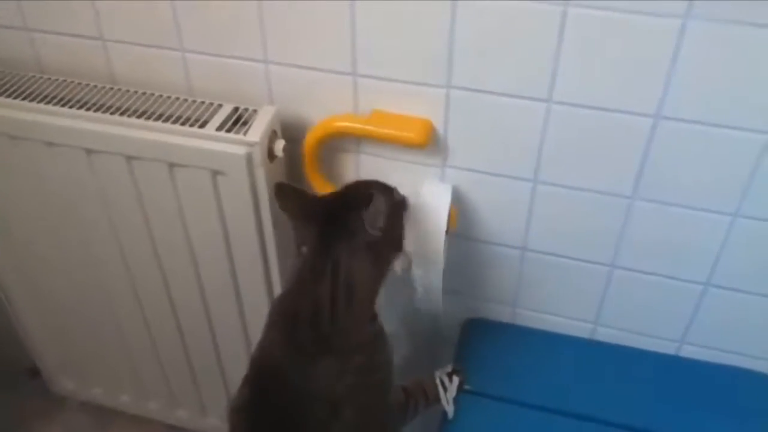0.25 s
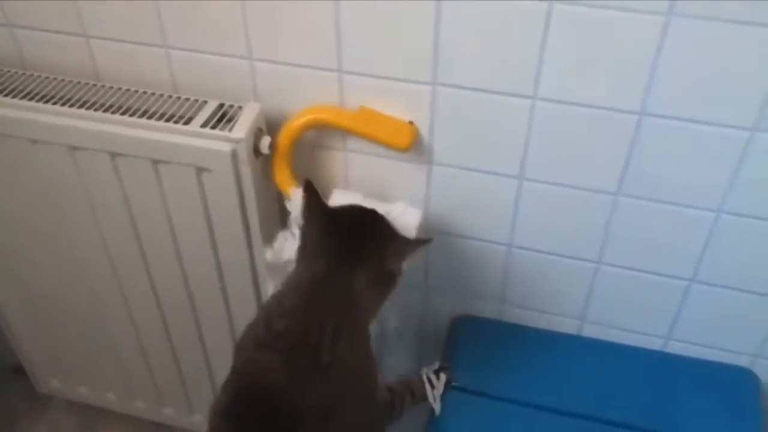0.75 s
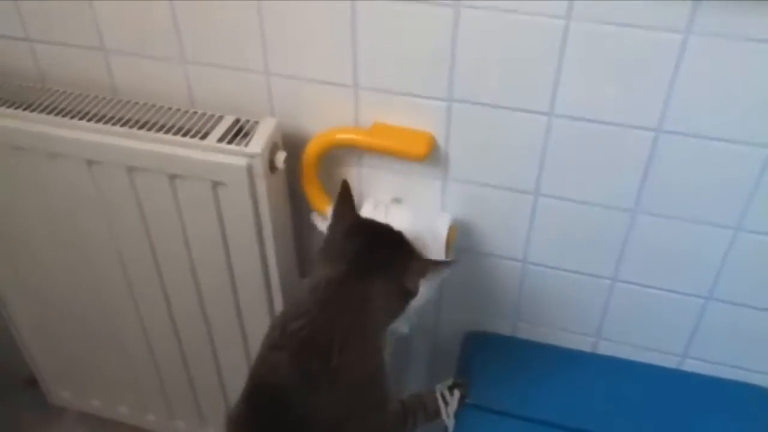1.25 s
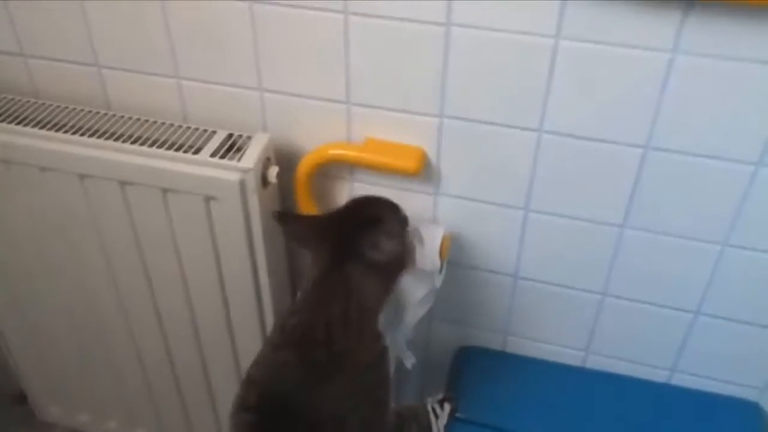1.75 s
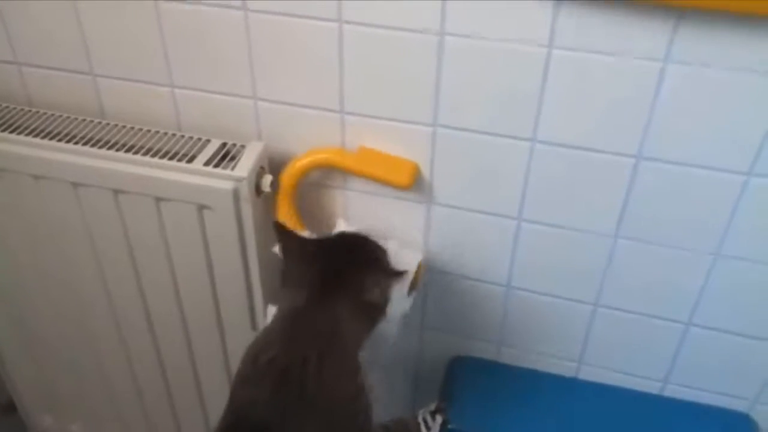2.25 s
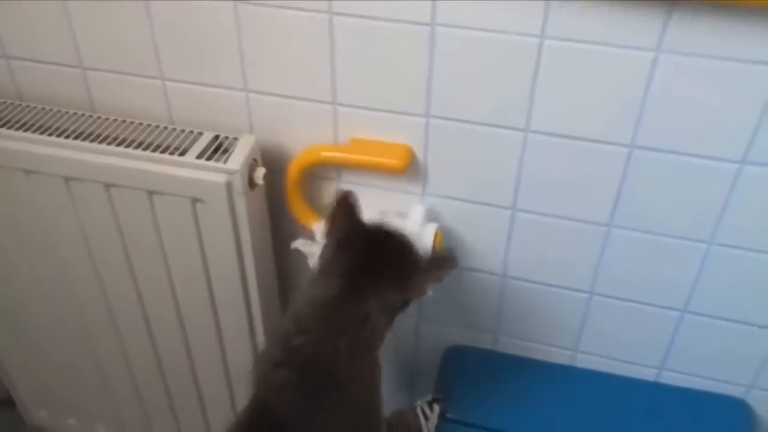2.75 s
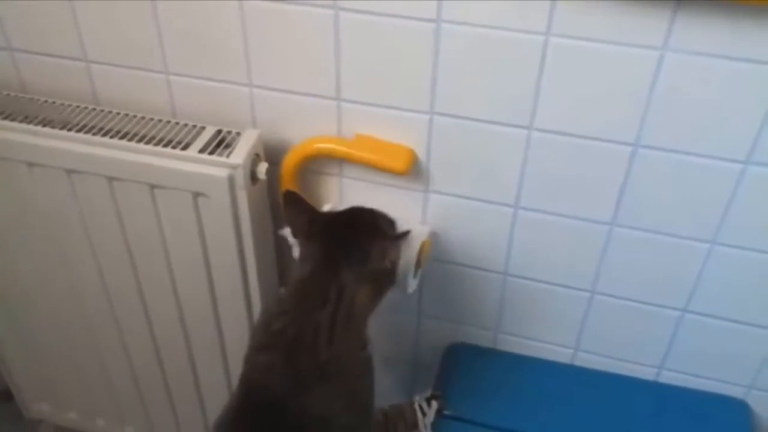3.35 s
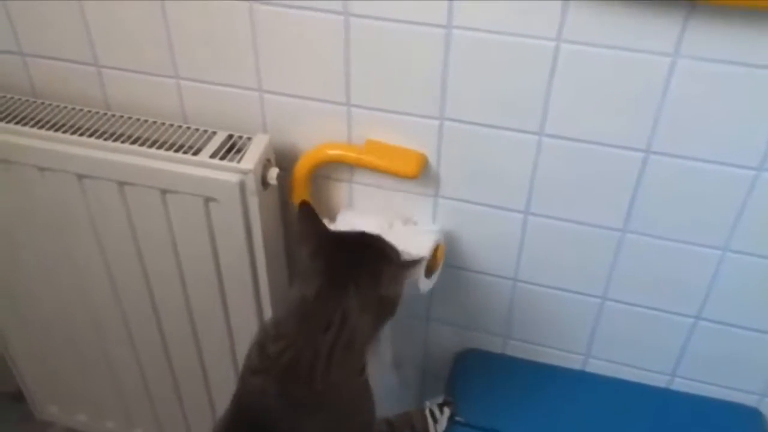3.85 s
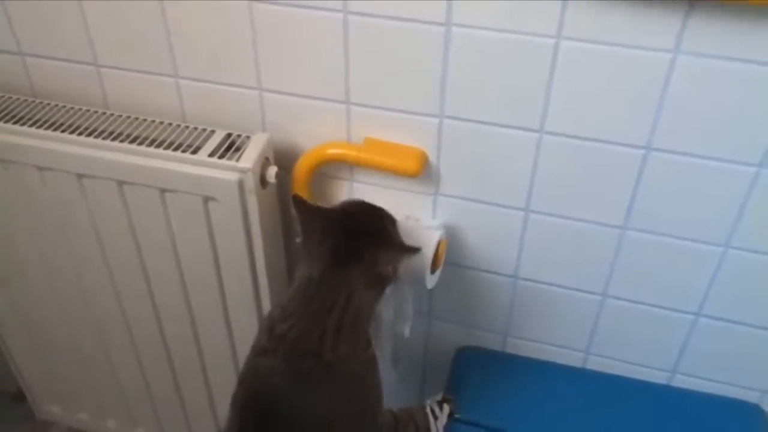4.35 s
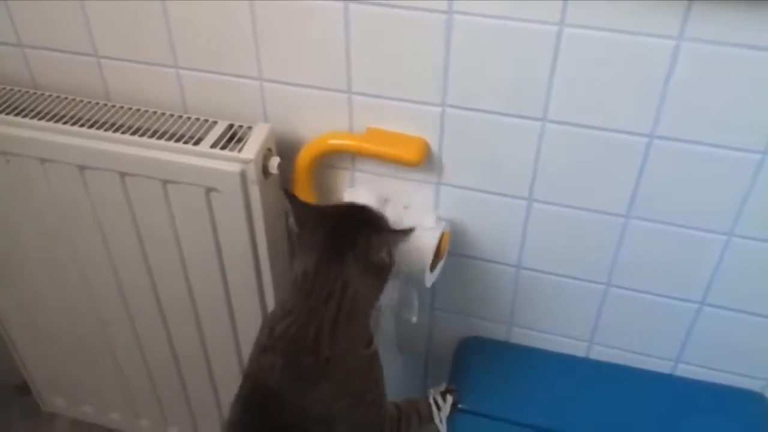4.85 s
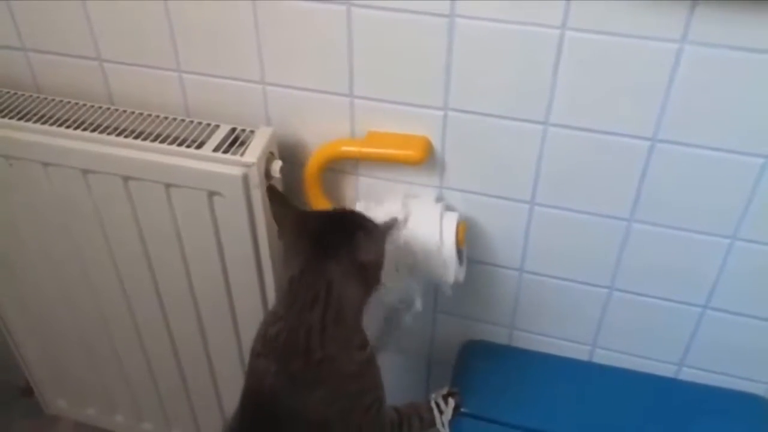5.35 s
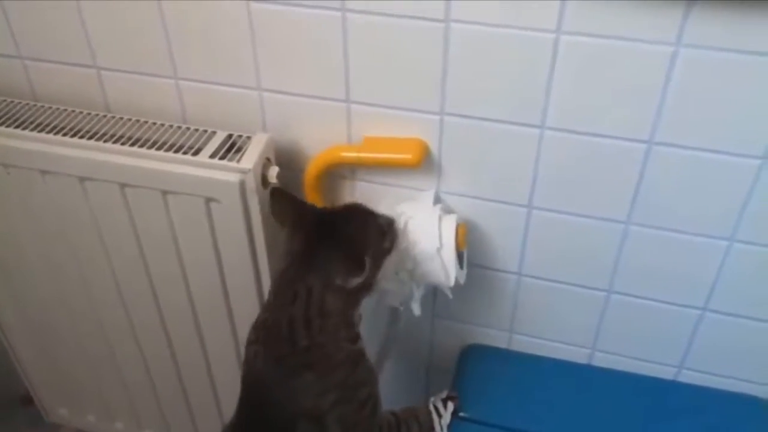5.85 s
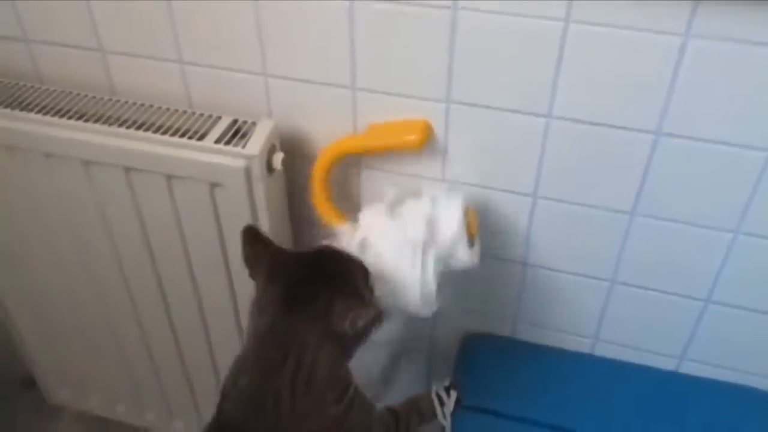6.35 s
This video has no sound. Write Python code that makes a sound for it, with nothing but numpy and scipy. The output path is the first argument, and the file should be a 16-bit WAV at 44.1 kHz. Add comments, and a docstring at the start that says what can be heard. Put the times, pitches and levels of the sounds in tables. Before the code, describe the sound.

Irregular clunks of a paper roll against its wall holder, mixed with scrabbly rustling and short tears, close by in a small hard room.

```python
"""Paper rustles and tears as a cat claws at a toilet paper roll on a plastic wall holder in a tiled bathroom.
Paper is clumped fibre snaps, shaped in half-octave bands; resonators ring as the cardboard core.
Blows and rocking of the roll ring the modes of holder arm and wall; claws knock as short damped sines.
Tiles add a short dense tail of decaying noise; faint hiss and two thin whistles lie below."""
import sys
import numpy as np
from scipy import signal
from scipy.fft import rfft, irfft
from scipy.io import wavfile

SR = 44100
rng = np.random.default_rng(int(sys.argv[2]) if len(sys.argv) > 2 else 0)


def amplitude_ratio(level_db):
    """Convert a level in decibels to the matching linear amplitude (field) ratio."""
    exponent = np.asarray(level_db, float) / 20
    return 10 ** exponent


def persist_wave(psi):
    """Save psi, clipped to +-1, as 16-bit WAV."""
    counts = np.round(np.clip(psi, -1, 1) * 32767).astype(np.int16)
    wavfile.write(sys.argv[1], SR, np.atleast_2d(counts).T)


N = 291060

# The roll thrown against the arm. Each row: start in seconds, level in dB, hardness in dB per octave.
ROLL_BLOWS = [(0.003, -26.5, -2), (0.138, -23.5, 6.5), (0.185, -24, -1), (0.205, -18.5, -1),
              (0.264, -27, -0.5), (0.284, -20.5, 6.5), (0.344, -31.5, 1), (0.655, -49, 8),
              (1.113, -43, 7.5), (1.155, -46, 0), (1.599, -30.5, -1), (1.618, -21, 4.5), (1.639, -15, -6),
              (1.66, -32, -9), (1.726, -52, -9), (2.809, -17.5, 9), (2.849, -17.5, -5), (2.915, -18, 1.5),
              (3.019, -24, 1), (3.038, -23, -2.5), (3.96, -52, 4), (4.071, -32, 13), (4.223, -25, 1),
              (4.254, -22.5, -1), (4.274, -28, 2.5), (5.31, -47, 4), (5.459, -25, -7), (5.5, -27, -9),
              (5.716, -29, -9), (5.738, -27, -0.5), (6.09, -45, 8.5), (6.38, -45.5, -10.5),
              (6.554, -37, -10), (6.582, -33, -2)]


def rms_one(x):
    """Scales to rms 1."""
    return x / np.sqrt(np.mean(x ** 2) + 1e-20)


def at_hz(points, hz):
    """Reads a curve on a log-frequency axis."""
    points_hz, values = np.transpose(points)
    return np.interp(np.log(hz + 1), np.log(points_hz), values)


def colour(x, spectrum):
    """Shapes noise by a spectrum in dB; rms 1."""
    bins_hz = np.arange(N // 2 + 1) * SR / N
    return rms_one(irfft(rfft(x) * amplitude_ratio(at_hz(spectrum, bins_hz)), N))


def cut(x, hz, kind):
    """Second-order high- or low-pass."""
    sos = signal.butter(2, np.clip(hz, 20, .45 * SR), kind, fs=SR, output="sos")
    return signal.sosfilt(sos, x)


def drift(rate_hz):
    """Slow random wander of rms 1: noise through two equal one-pole low-passes."""
    r = np.exp(-2 * np.pi * rate_hz / SR)
    wander = signal.lfilter([1], [1, -2 * r, r * r], rng.standard_normal(N + SR))
    return rms_one(wander[SR:])     # the filter settles in the first second


def ring(drive, hz, t60_s):
    """Two-pole resonator: a unit click sets off a decaying sine of initial height 1."""
    r = amplitude_ratio(-60 / (max(t60_s, .002) * SR))
    w = 2 * np.pi * hz / SR
    return signal.lfilter([0, np.sin(w)], [1, -2 * r * np.cos(w), r * r], drive + 1e-18)


def add(out, start_s, sound):
    """Mixes a short sound in at its start time."""
    i = round(start_s * SR)
    out[i:i + len(sound)] += sound[:N - i]


def pawing(hollow):
    """Level of all paw strokes, each swelling and fading evenly in dB; hollow weighs the ring of the core."""
    # Each row: peak time in seconds, level in dB, swell and fade in seconds per 12 dB, hollow core ring in dB.
    strokes = [(0.0, -40.5, .02, 0.071, -3), (.068, -47, .02, 0.031, -5), (.1, -47.5, 0.045, .3, -1),
               (.5, -54.5, .01, 0.089, 0), (.56, -54.5, 0.056, 0.044, 8), (.652, -55.5, 0.014, 0.28, -7),
               (.75, -50.5, 0.095, 0.12, 6), (0.819, -47, .03, 0.035, 9), (.857, -47, 0.027, .05, 7.5),
               (.91, -49.5, 0.12, 0.089, 2), (1.047, -50, 0.035, 0.06, -6.5),
               (1.116, -52.5, 0.11, 0.16, 1.5), (1.27, -51, 0.12, 0.073, -3), (1.33, -54, 0.06, 0.14, -7),
               (1.402, -49, 0.049, 0.12, -2.5), (1.78, -55.5, 0.44, 0.073, 2),
               (1.888, -60, 0.056, 0.19, -1), (2.06, -48.5, 0.022, .03, 0), (2.198, -50.5, .06, 0.048, 1),
               (2.424, -49.5, .13, 0.12, 2), (2.49, -48, 0.09, 0.074, 2.5),
               (2.585, -46.5, 0.082, 0.066, 1.5), (2.67, -51.5, 0.058, 0.082, 2.5),
               (2.775, -53, 0.035, .12, -5), (3.305, -55, 0.014, .12, 3), (3.39, -52, 0.11, 0.14, 2.5),
               (3.502, -59.5, 0.026, 0.014, 5), (3.556, -53.5, .008, .15, 5), (3.63, -54, 0.1, .15, 0.5),
               (3.73, -51, .08, 0.12, -1), (3.786, -46, .1, 0.071, 3), (3.924, -45.5, 0.029, 0.058, 2.5),
               (4.045, -45.5, 0.041, 0.047, -3), (4.12, -50, .08, 0.02, 1), (4.18, -51, 0.087, .06, 3),
               (4.211, -43.5, 0.0051, 0.12, -1), (4.3, -45, 0.13, 0.15, -6), (4.37, -51.5, .04, 0.034, -1),
               (4.606, -58.5, 0.045, .09, 4), (4.703, -50.5, .01, 0.0089, -4), (4.78, -58.5, .05, 0.025, 1),
               (4.84, -59, 0.048, 0.15, 1), (4.982, -57, 0.058, 0.094, 11.5), (5.03, -56, .02, .15, -4),
               (5.18, -56, 0.073, .2, 10), (5.274, -50.5, .15, .08, 3.5), (5.364, -44.5, 0.14, 0.022, 5.5),
               (5.45, -45, 0.09, 0.078, -4), (5.568, -71.5, .005, 0.063, 24), (5.71, -50, 0.078, 0.24, -19),
               (5.896, -54, 0.48, 0.027, 2), (6.012, -53.5, 0.092, 0.034, 0), (6.14, -53, 0.12, 0.075, -4),
               (6.25, -60, 0.069, 0.085, 6), (6.362, -51, 0.17, 0.09, -4),
               (6.43, -46.5, 0.043, 0.062, -1.5), (6.49, -58, 0.058, .05, -1),
               (6.546, -43.5, 0.063, 0.22, -0.5)]
    range_db, grid_s = 12, .002
    t = np.arange(0, N / SR + grid_s, grid_s)
    peak_s, db, swell_s, fade_s, core_db = np.transpose(strokes)[:, :, None]
    before = (peak_s - t) / np.maximum(swell_s, .003)
    after = (t - peak_s) / np.maximum(fade_s, .003)
    down = np.where(t < peak_s, before, after)
    power = amplitude_ratio(db + hollow * core_db - range_db * down) ** 2
    return np.interp(np.arange(N) / SR, t, np.sqrt(power.sum(axis=0)))


def fibres(per_s, spread_db, clump_db):
    """Fibres snap in clumps, with uneven sizes; the sheet colours them."""
    # Each row: frequency in Hz, relative level in dB per Hz.
    sheet_spectrum = [(250, -16), (450, -7), (700, -2), (1000, 0.5), (1400, -0.5), (2000, -2), (3000, -7),
                      (4500, -12.5), (7000, -18), (10000, -27), (13000, -36), (15500, -50)]
    snaps = rng.random(N) < per_s * amplitude_ratio(clump_db * drift(25)) / SR
    sizes = amplitude_ratio(spread_db * np.minimum(rng.exponential(1, N), 5))
    signs = rng.choice([-1, 1], N)
    return colour(snaps * sizes * signs, sheet_spectrum)


def paper():
    """Rustle follows the paws, tears swell and die; brightness tilts both about 1500 Hz; the tube rings along."""
    # Paper jerked and torn. Each row: start in seconds, level in dB, rise in seconds, length in seconds,
    # brightness in dB per octave.
    tears = [(0.104, -30, .006, 0.022, 4.5), (0.118, -18, 0.0049, 0.1, -3.5),
             (0.178, -16.5, 0.0016, 0.018, 2), (0.253, -17.5, 0.0044, 0.04, -8.5),
             (0.796, -30, 0.013, 0.017, 2), (1.358, -34, 0.0076, 0.045, 5.5),
             (1.59, -18, 0.011, 0.055, 3.5), (1.625, -13, 0.0083, 0.035, 0.5),
             (1.7, -27.5, 0.0079, 0.023, -3.5), (2.771, -24, 0.02, 0.059, 4),
             (2.797, -10.5, 0.0013, 0.051, -5.5), (2.872, -14, 0.0048, 0.025, -3),
             (2.889, -23, 0.0038, 0.052, 1), (2.975, -23.5, 0.0025, 0.059, -1),
             (3.008, -25.5, 0.0019, 0.042, -4), (3.293, -40, 0.011, 0.022, 3),
             (3.813, -30, 0.0027, 0.047, -2), (3.904, -54, 0.015, 0.016, -9),
             (4.069, -12, 0.0032, 0.015, -4), (4.22, -10, 0.0068, 0.024, 0), (4.247, -16, .005, 0.013, 1),
             (5.381, -23.5, 0.0058, 0.097, 1.5), (5.461, -21, 0.0078, 0.043, -1.5),
             (5.711, -24.5, 0.0021, 0.03, -1.5), (6.089, -33, 0.0042, 0.029, 1.5),
             (6.422, -35.5, 0.0043, 0.026, 4), (6.545, -32, 0.0034, .04, -1.5)]
    # Air and wall of the cardboard tube. Each row: frequency in Hz, drive in dB, t60 in seconds.
    core_modes = [(1096, -2.5, 0.075), (1290, 2.5, 0.047), (1443, -1.5, 0.047), (1654, -5, 0.042),
                  (1930, -5, 0.037), (2255, 4, .03)]
    core_hz, core_octaves = 1400, 0.46
    tear_crest_db = 16     # peak over rms of a tear
    tube_db, tube_hollow = -13.5, 1.2     # share of strokes ringing in the tube, its growth with hollowness
    sheet = fibres(per_s=6000, spread_db=2.5, clump_db=3.5)
    slope_db = 1.7 + 0.38 * drift(4.2)     # stroke brightness per octave
    edges_hz = 250 * 2 ** np.arange(0, 6.1, .5)
    t = np.arange(SR // 4) / SR
    out = np.zeros(N)
    for k, (low, high) in enumerate(zip(edges_hz, edges_hz[1:])):
        hz = np.sqrt(low * high)
        octaves = np.log2(hz / 1500)
        hollow = np.exp(-(np.log2(hz / core_hz) / core_octaves) ** 2)     # strongest near the tube's own pitch
        level = pawing(hollow) * amplitude_ratio(slope_db * octaves + 0.71 * drift(21))
        for start_s, db, rise_s, length_s, tear_slope_db in tears:
            rise = 1 - np.exp(-t / max(rise_s, .001))
            fall = np.exp(-(t / max(length_s, .005)) ** 1.44)
            add(level, start_s, amplitude_ratio(db - tear_crest_db + tear_slope_db * octaves) * rise * fall)
        band = signal.sosfilt(signal.butter(2, [low, high], "band", fs=SR, output="sos"), sheet)
        out += (-1) ** k * level * band     # alternate signs join neighbouring bands without notches
    tube = rms_one(sum(amplitude_ratio(db) * ring(sheet, hz, t60_s) for hz, db, t60_s in core_modes))
    return out + amplitude_ratio(tube_db) * pawing(tube_hollow) * tube


def background():
    """Hiss and hum of the house as gently wandering coloured noise; two thin electrical whistles as sines."""
    # Each row: frequency in Hz, relative level in dB per Hz.
    floor_spectrum = [(20, -40), (35, -3.5), (64, 5.5), (101, 6), (305, 0.5), (456, -2.5), (760, -12.5),
                      (1300, -21), (2000, -13), (4000, -10.5), (8500, -12), (11500, -16.5), (13500, -19),
                      (14700, -28), (15600, -38)]
    # Each row: frequency in Hz, rms level in dB.
    whistles = [(11100, -83), (14979, -70)]
    t = np.arange(N) / SR
    floor_level = amplitude_ratio(-57.5 + .5 * drift(3.2))
    hiss = floor_level * colour(rng.standard_normal(N), floor_spectrum)
    return hiss + sum(np.sqrt(2) * amplitude_ratio(db) * np.sin(2 * np.pi * hz * t) for hz, db in whistles)


def rocking():
    """How hard the roll rocks on the arm: with the strokes, and dying away after each blow."""
    under_db, hollow_loss = -8.5, 0.27     # a stroke rocks it less when the core rings hollow
    after_db, after_t60_s = -27, 0.51
    wander_db = 3.0
    t = np.arange(SR // 2) / SR
    level = amplitude_ratio(under_db) * pawing(-hollow_loss)
    for start_s, db, _ in ROLL_BLOWS:
        add(level, start_s, amplitude_ratio(db + after_db - 60 * t / after_t60_s))
    return level * amplitude_ratio(wander_db * drift(9.4))


def arm(rock):
    """A blow's push and brief judder strike every mode unevenly; the rocking roll keeps the modes murmuring."""
    # Arm and wall. Each row: frequency in Hz, relative drive in dB, t60 after a blow in seconds.
    arm_modes = [(61, -18, 0.38), (96, -24.5, 0.29), (120, -13.5, 0.19), (150.8, -12.5, 0.24),
                 (172, -17, 0.36), (188, -7.5, 0.16), (220.7, -11, 0.22), (239, -1, 0.11),
                 (267.8, -1.5, 0.31), (316.8, 3, 0.2), (355.7, -4, 0.22), (375, -1, 0.18), (411, -4, 0.12),
                 (449.8, -6.5, 0.11), (520, -6, 0.08), (590, -7.5, 0.1), (717, -11.5, 0.2),
                 (832.4, -11, 0.14), (940, -25, .14), (960, -11, 0.19), (1120, -37, 0.077),
                 (1315, -16.5, 0.18)]
    blow_share_db = -13.5     # part of a blow that one mode takes
    judder_s = 0.015
    t = np.arange(SR // 2) / SR
    rumble = cut(rng.standard_normal(N), 910, "low")
    murmur = sum(amplitude_ratio(db) * ring(rumble, hz, .5 * t60_s) for hz, db, t60_s in arm_modes)
    out = rock * rms_one(murmur)
    luck = rng.normal(0, 1, (len(ROLL_BLOWS), len(arm_modes)))
    for (start_s, db, hard_db), blow_luck in zip(ROLL_BLOWS, luck):
        push = t == 0
        judder = 0.037 * rng.standard_normal(len(t)) * np.exp(-t / judder_s)
        boom = np.zeros(len(t))
        for k, ((hz, mode_db, t60_s), z) in enumerate(zip(arm_modes, blow_luck)):
            tilt_db = np.clip(hard_db, -4, 8) * np.log2(hz / 300)
            boom += (-1) ** k * amplitude_ratio(mode_db + tilt_db + 2 * z) * ring(push + judder, hz, t60_s)
        add(out, start_s, amplitude_ratio(db + blow_share_db) * cut(boom, 1950, "low"))
    return cut(out, 86, "high")


def bathroom(x):
    """Dense reflections off the tiles: noise that dies octave by octave, after a short gap."""
    # Each row: frequency in Hz, t60 in seconds.
    room_t60 = [(150, 0.3), (500, 0.31), (1500, 0.15), (4000, 0.058), (12000, 0.09)]
    gap_s = .006
    t = np.arange(SR // 2) / SR
    tail = np.zeros(len(t))
    for hz in 90 * 2. ** np.arange(8):
        t60_s = at_hz(room_t60, hz)
        noise = rng.standard_normal(len(t))
        band = cut(cut(noise, hz / np.sqrt(2), "high"), hz * np.sqrt(2), "low")
        tail += band * amplitude_ratio(-60 * t / t60_s) / np.sqrt(t60_s)
    tail /= np.sqrt(np.sum(tail ** 2))
    tail = np.r_[np.zeros(round(gap_s * SR)), tail]
    return signal.fftconvolve(x, tail)[:N]


def knocks():
    """A hard contact: a short ring at the struck spot with two looser neighbours, and a bright click."""
    # Each row: start in seconds, level in dB, pitch of the struck spot in Hz, ring t60 in seconds,
    # click in dB relative to the ring.
    contacts = [(0.067, -27, 900, 0.0064, -9), (0.1185, -22, 1880, .02, 0),
                (0.182, -20.5, 1400, 0.012, 5.5), (.189, -19, 1270, 0.011, -19),
                (0.261, -17, 1880, 0.017, -32), (.276, -21, 795, 0.023, -28),
                (.298, -24.5, 870, 0.029, -27), (0.497, -35, 2200, 0.016, -22), (.58, -31, 550, 0.0086, 0),
                (.652, -42, 1900, 0.011, -24), (.679, -37.5, 1440, .02, -17), (1.105, -39, 810, .04, -25),
                (1.5856, -31.5, 2480, 0.011, 1), (1.627, -22, 2000, .015, 4),
                (1.7013, -24, 1300, .018, -20), (2.0563, -36, 2240, 0.0082, -2),
                (2.412, -34.5, 1046, 0.032, -6), (2.801, -13, 990, 0.043, -16),
                (2.872, -35, 5600, .022, -9), (2.893, -30, 5500, .018, -12),
                (2.9843, -33, 2470, 0.0097, -16), (3.014, -27, 1280, .0079, -1),
                (3.5533, -41, 827, 0.055, -22), (3.8153, -21, 1740, 0.047, -1.5),
                (4.0712, -28.5, 739, 0.051, 0), (4.2245, -28, 1830, 0.015, -3),
                (5.3293, -34, 1320, 0.034, -17), (5.3886, -33, 1810, .0087, -12),
                (5.5698, -26, 1490, 0.0083, -28), (5.7215, -27, 1350, 0.013, -10),
                (6.0946, -32.5, 2200, 0.0098, 9.5), (6.429, -30, 3170, 0.0098, -2.5),
                (6.5418, -32, 880, 0.0071, -2.5)]
    neighbour_db, loss_db_per_cycle = -3, 0.43     # the longer a spot rings, the purer it is
    click = np.eye(1, SR // 8)[0]
    snap = 7.2 * cut(cut(cut(click, 2600, "high"), 4900, "low"), 6200, "low")
    out = np.zeros(N)
    spreads = rng.normal(0, 1, (len(contacts), 2))
    for (start_s, db, hz, t60_s, click_db), spread in zip(contacts, spreads):
        side_db = neighbour_db - loss_db_per_cycle * hz * t60_s
        spot = ring(click, hz, t60_s)
        below = ring(click, 0.67 * hz * amplitude_ratio(0.87 * spread[0]), 0.64 * t60_s)
        above = ring(click, 1.714 * hz * amplitude_ratio(0.48 * spread[1]), 1.4 * t60_s)
        add(out, start_s, amplitude_ratio(db) * (spot + amplitude_ratio(side_db) * (below - above) + amplitude_ratio(click_db) * snap))
    return out


def scene():
    """Everything at the holder, its reflections and the background."""
    crisp = paper() + knocks()
    boom = arm(rocking())
    reflections = bathroom(amplitude_ratio(-8.5) * crisp + amplitude_ratio(-5.5) * boom)
    return (crisp + boom + reflections + background())[None]


def band_limit(x):
    """A steep low-pass at the top of the band."""
    return signal.sosfilt(signal.butter(12, 15580, fs=SR, output="sos"), x)


def record(dry):
    """One microphone takes the finished mix."""
    return band_limit(dry)


dry = scene()
out = record(dry)
persist_wave(out)
```